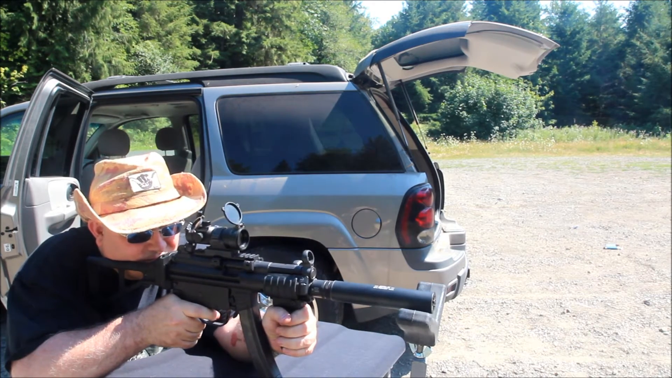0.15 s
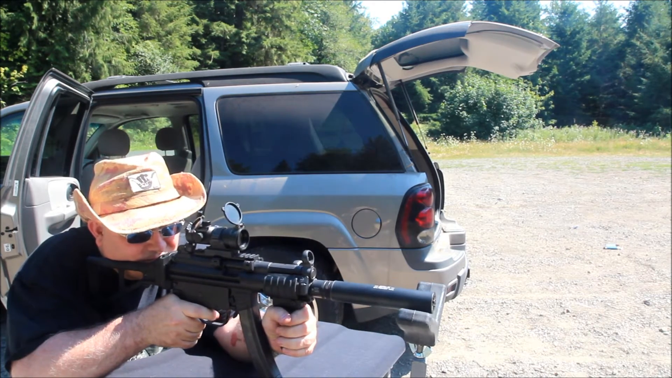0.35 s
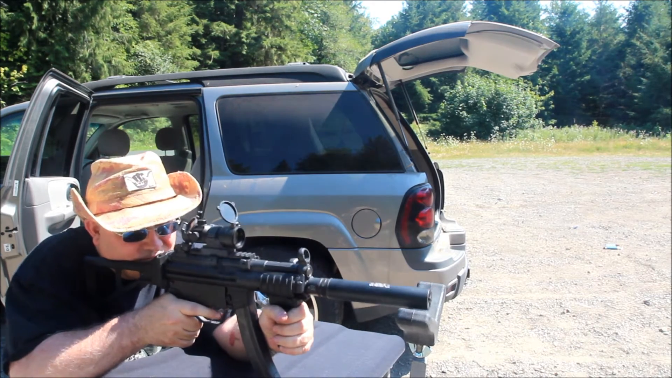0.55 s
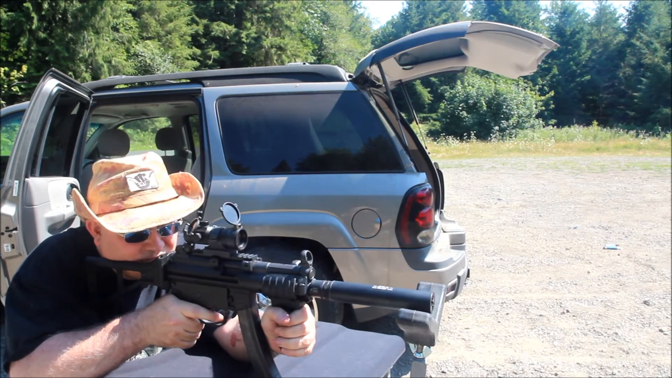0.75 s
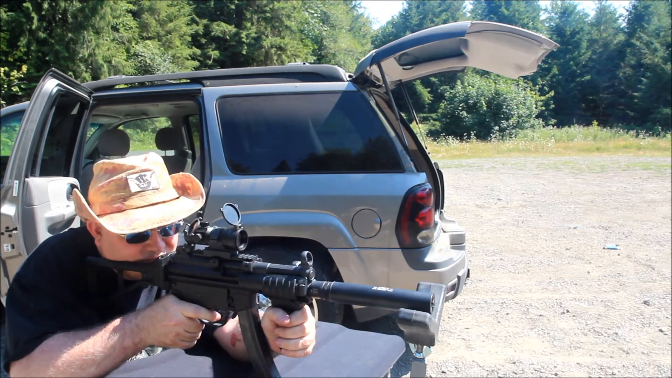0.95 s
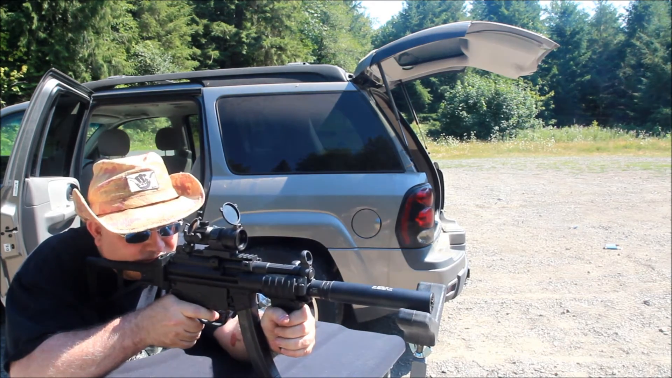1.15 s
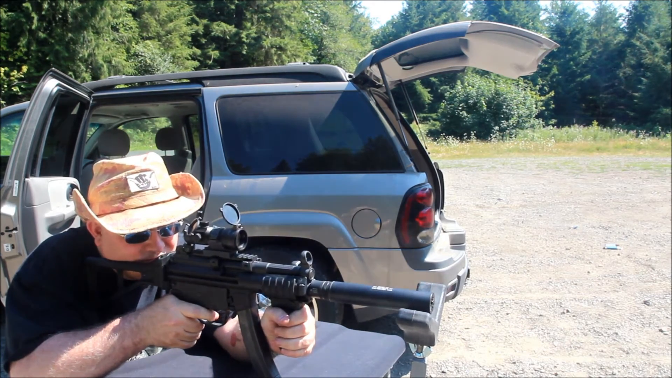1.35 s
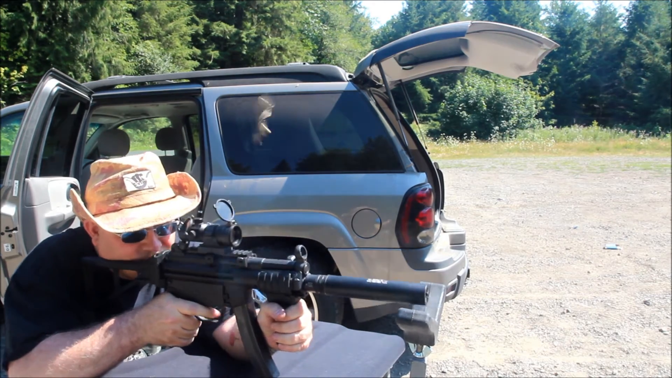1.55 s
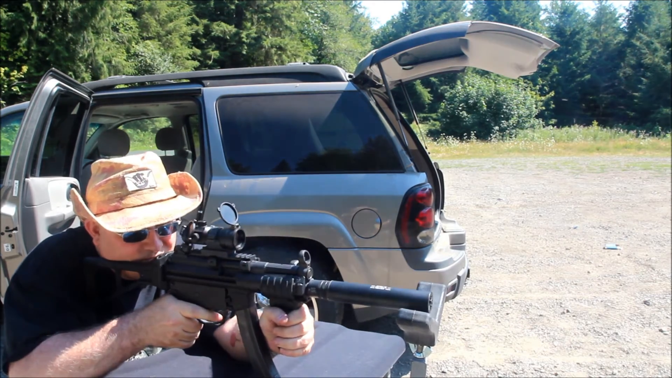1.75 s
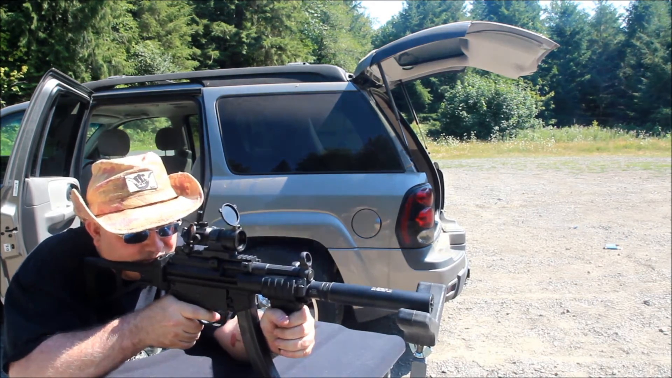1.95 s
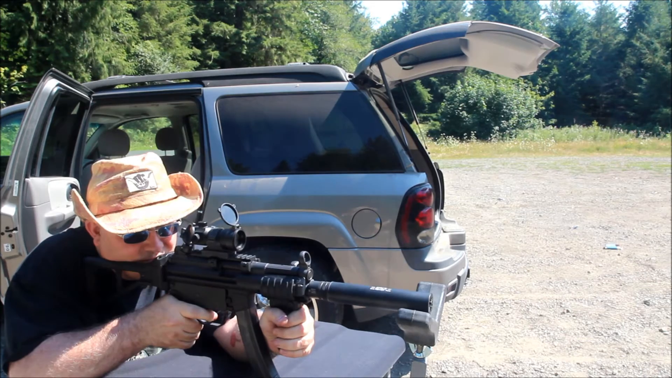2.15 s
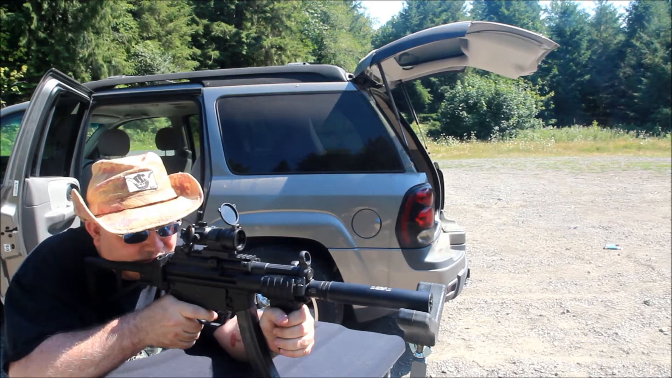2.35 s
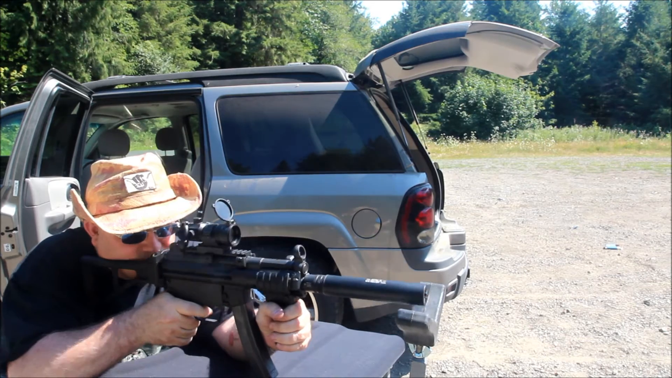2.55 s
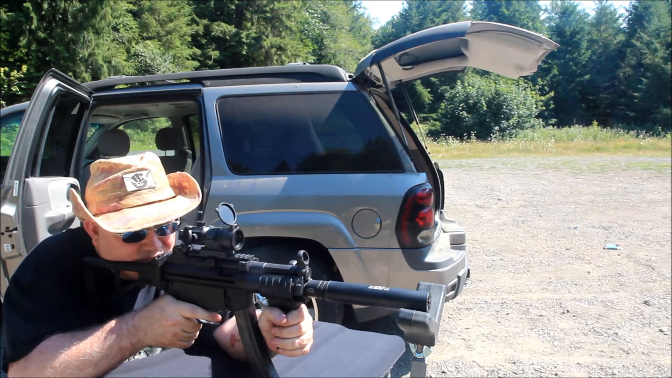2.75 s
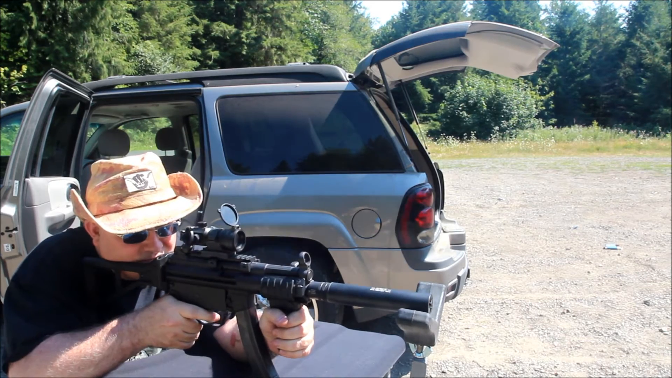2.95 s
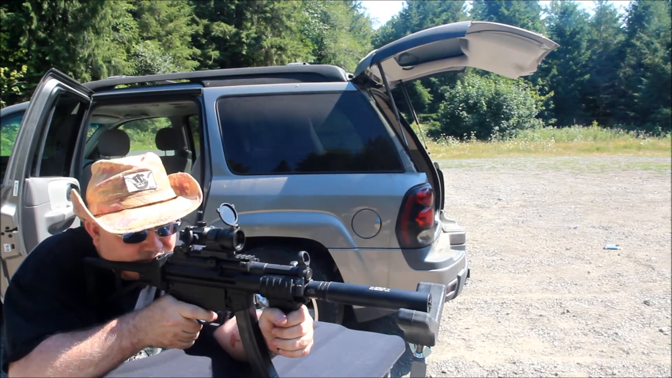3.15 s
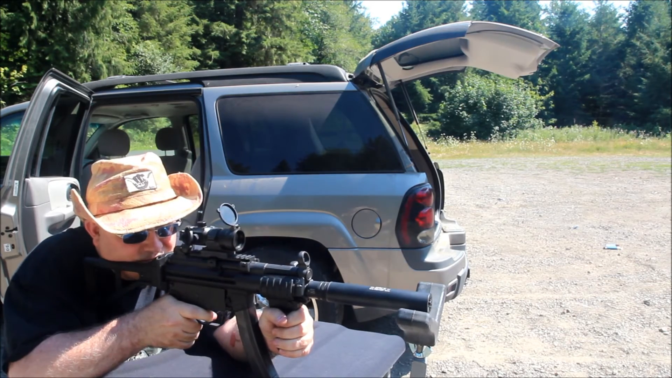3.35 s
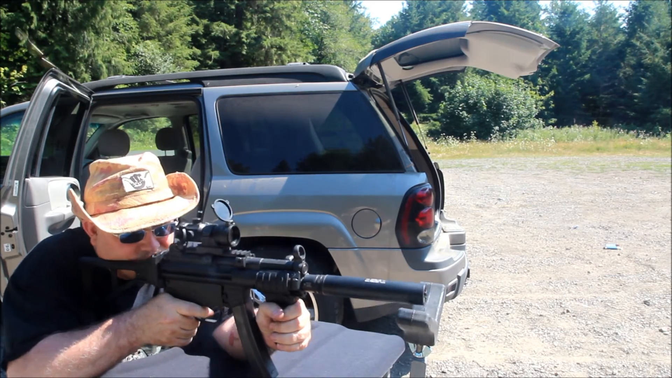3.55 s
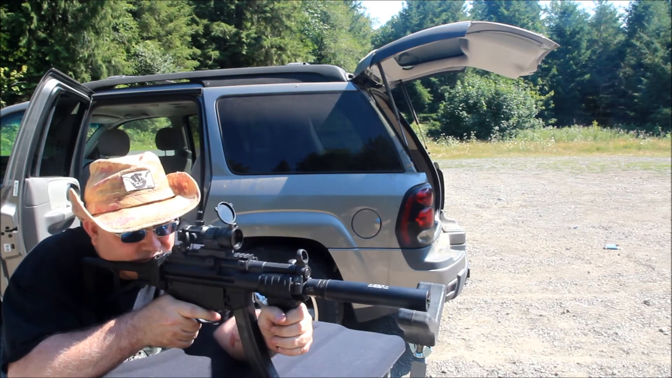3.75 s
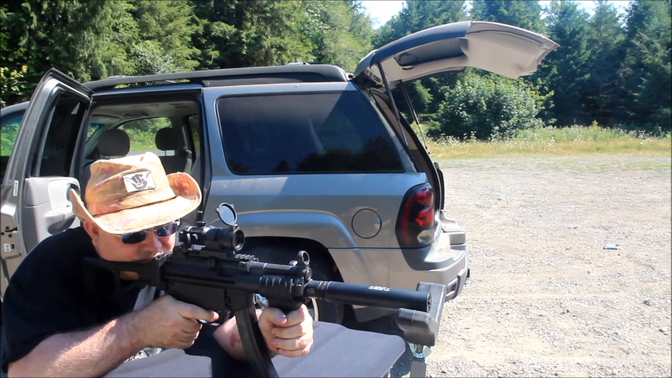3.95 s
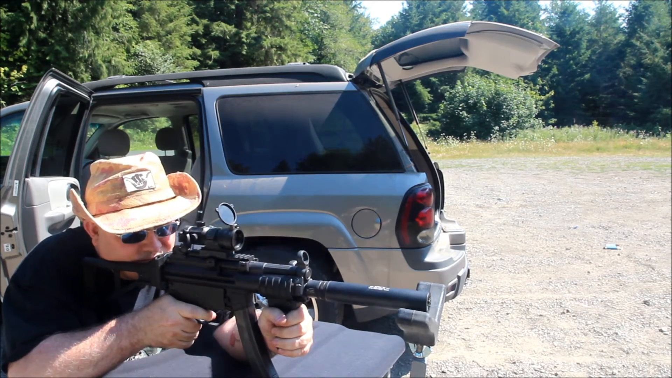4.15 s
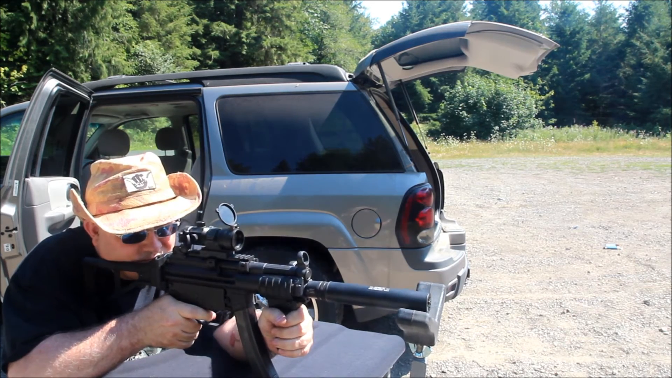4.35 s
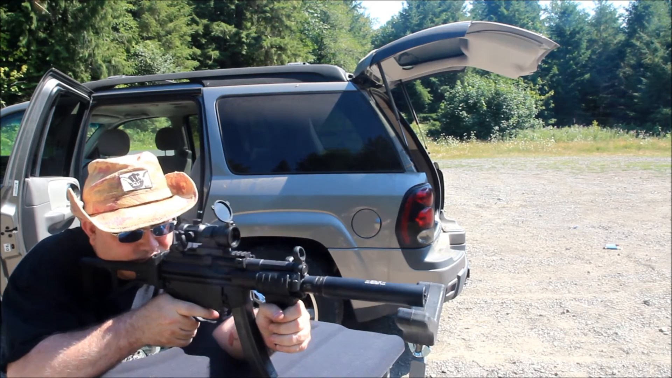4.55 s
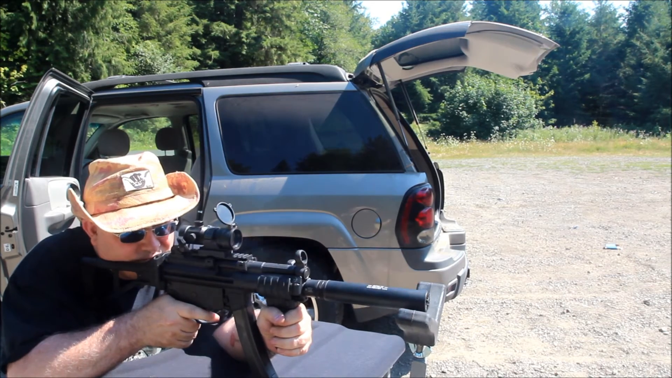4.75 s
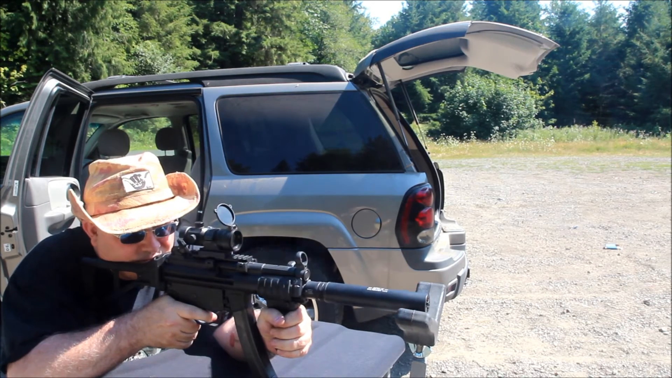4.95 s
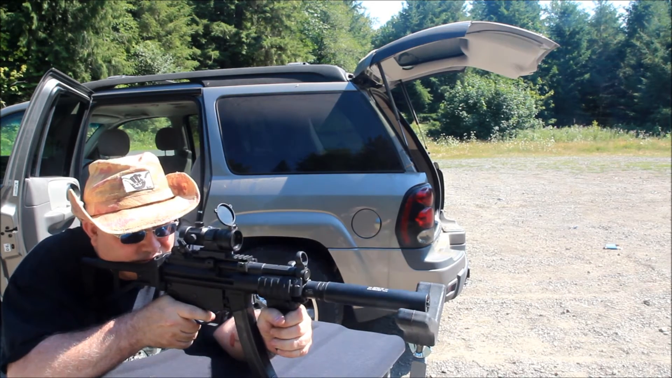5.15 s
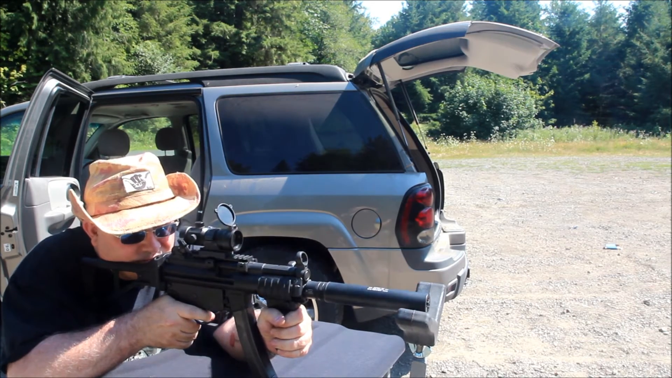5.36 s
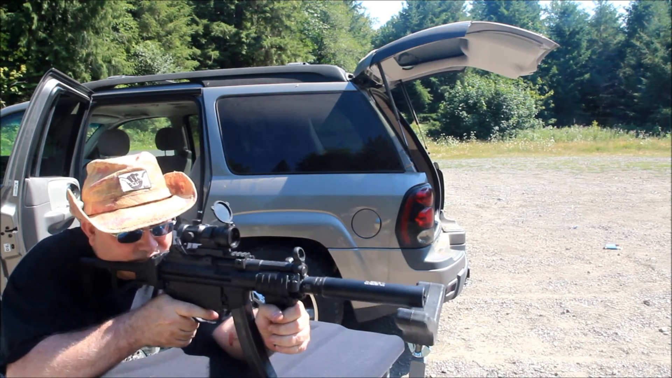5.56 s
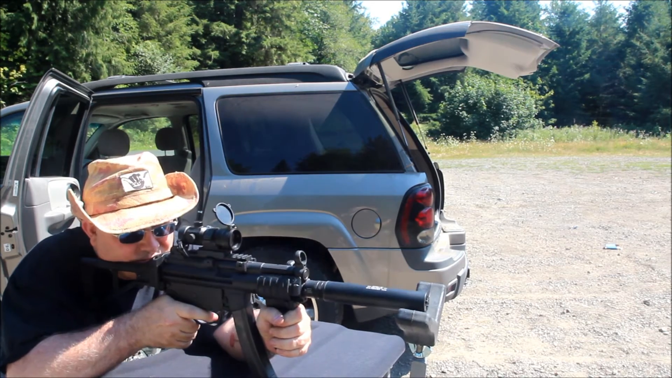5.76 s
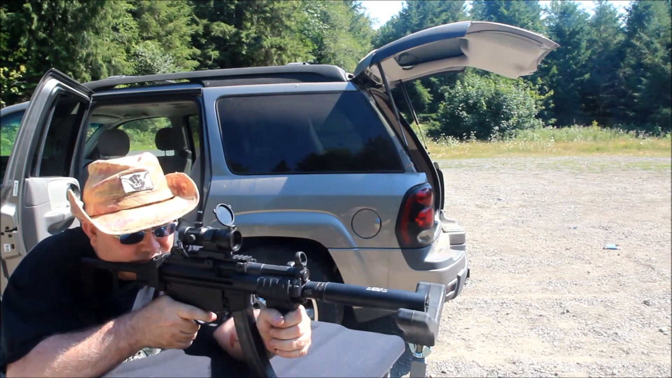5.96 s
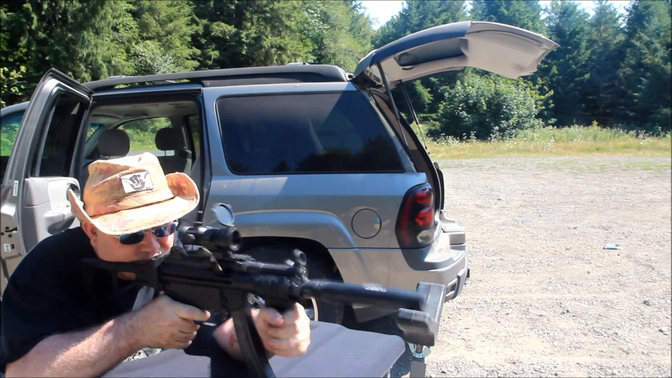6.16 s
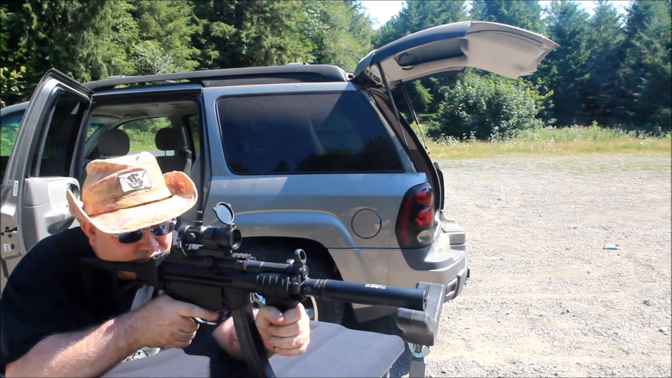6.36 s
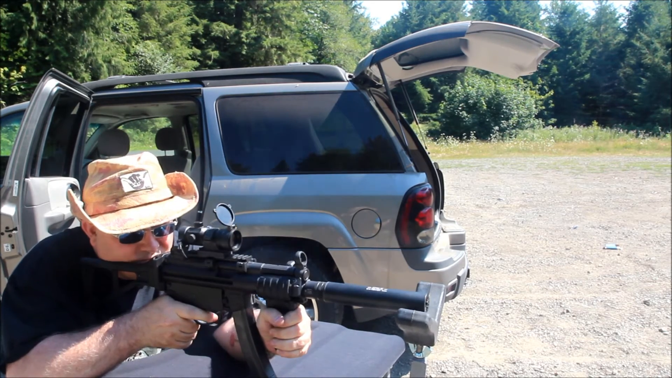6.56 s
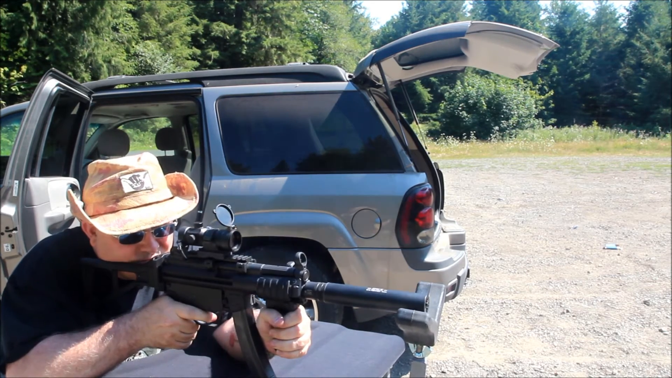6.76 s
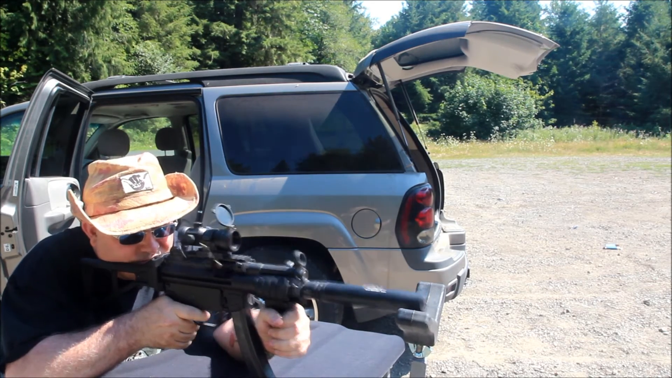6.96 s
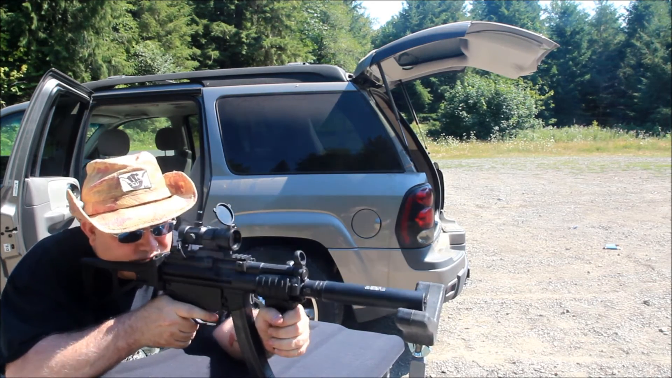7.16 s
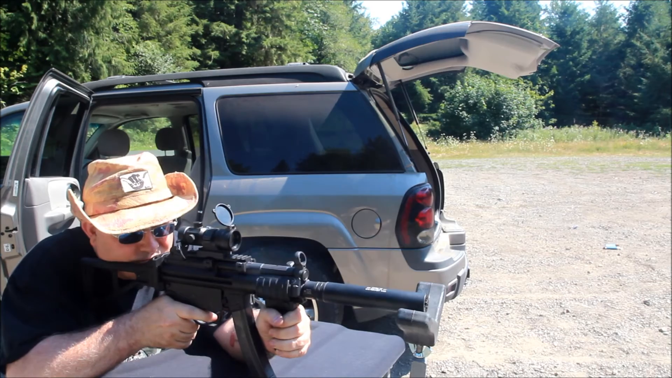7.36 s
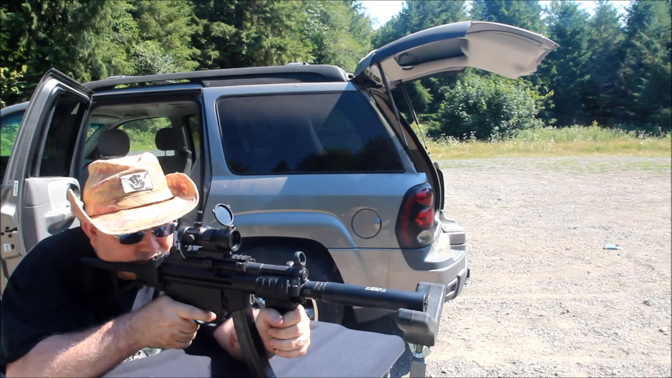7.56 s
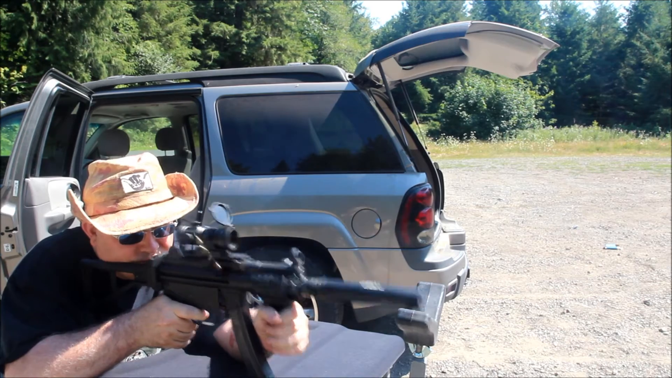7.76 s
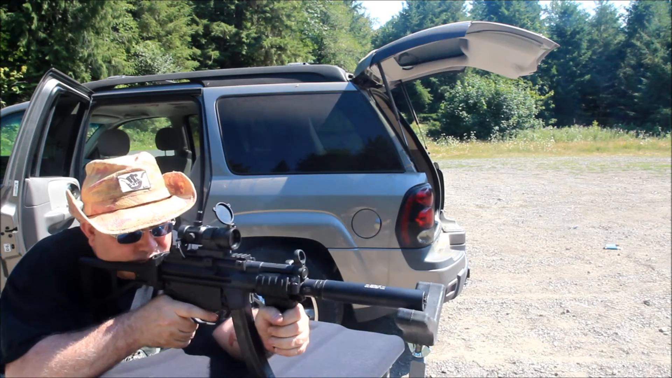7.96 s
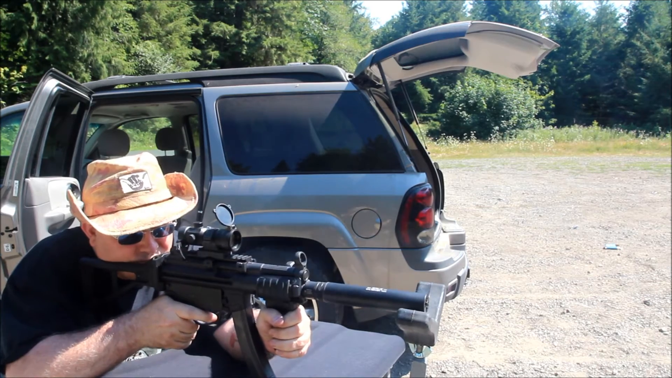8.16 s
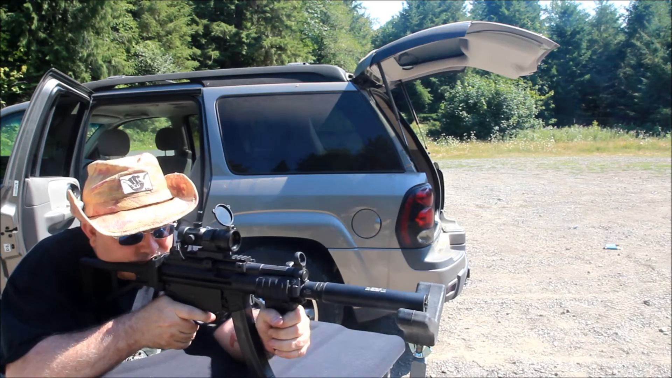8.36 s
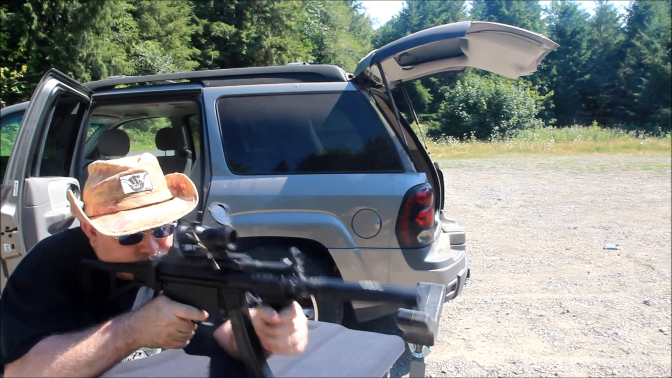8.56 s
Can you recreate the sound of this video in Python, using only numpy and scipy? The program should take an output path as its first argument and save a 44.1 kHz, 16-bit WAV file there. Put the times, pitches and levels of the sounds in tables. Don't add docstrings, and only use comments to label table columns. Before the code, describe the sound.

Nine suppressed gunshots fired singly, each a muffled burst wrapped in clattering steel action, with bullet thumps and tree echoes across an open gravel range.

```python
import sys
import numpy as np
from scipy import signal
from scipy.fft import rfft, irfft
from scipy.io import wavfile
from scipy.ndimage import uniform_filter1d

SR = 44100
rng = np.random.default_rng(int(sys.argv[2]) if len(sys.argv) > 2 else 0)


def waveform_to_disk(signal):
    frames = np.transpose(np.atleast_2d(signal))
    scaled = np.clip(frames, -1, 1) * 32767
    samples = np.round(scaled).astype(np.int16)
    wavfile.write(sys.argv[1], SR, samples)


def undo_db(level):
    steps = np.asarray(level, float) / 20
    return 10 ** steps


N = 379260

# [blast t/s, hammer level/dB, bass push level/dB, bolt back level/dB]
SHOTS = [(0.483, 13, -23.5, -7.5), (1.528, 12, -32, -11), (2.569, 12, -28.5, -1.5), (3.537, 0.5, -35, -7),
         (4.51, 8.5, -24.5, -4.5), (5.503, 9, -31.5, -6.5), (6.252, 0.5, -35, -10), (7.055, 2, -37, -17.5),
         (7.844, 3.5, -28.5, -8.5)]
# [t/s, crack level/dB, thud level/dB]
IMPACT = [(0.7014, -25.5, -31), (1.746, -20.5, -28), (2.7875, -28, -28), (3.7545, -24, -38.5),
          (4.7307, -25.5, -29.5), (5.7221, -30.5, -32.5), (6.4719, -26, -27.5), (7.2767, -27.5, -30),
          (8.0648, -28, -29.5)]
# [f/Hz, level/dB]
HAMMER_COLOUR = [(88, -38), (150, -9.5), (790, -4), (1690, -9.5), (4580, -0.5), (5910, -8), (6390, -2),
                 (12700, -1), (16000, -10)]
# [f/Hz, level/dB]
RATTLE_COLOUR = [(240, -62), (400, -34.5), (719, -14.5), (1040, -26.5), (2470, -14.5), (2930, -4),
                 (5600, -12.5), (7870, -27), (10900, -9.5), (16000, -28.5)]
# [f/Hz, level/dB]
FAR_WIDTH = [(18, -45), (300, -38), (2500, -42), (4400, -25), (8000, -13), (16500, -6.5)]


def at_hz(points, hz):
    f, db = np.transpose(points)
    return np.interp(np.log(hz + 1), np.log(f), db, left=-70, right=-70)


def high_pass(x, hz):
    return signal.sosfilt(signal.butter(2, hz, "high", fs=SR, output="sos"), x)


def coloured(white, colour, width):
    size = white.shape[1]
    hz = np.fft.rfftfreq(size, 1 / SR)
    gain_db = at_hz(colour, hz) + at_hz(width, hz) * [[0], [1]]
    mid, side = irfft(rfft(white) * undo_db(gain_db), size)
    return (mid + side * [[1], [-1]]) / np.sqrt(np.mean(mid ** 2))


def add(out, s, sound, pan_db=0):
    i = round(s * SR)
    panned = sound * undo_db(np.array([[.5], [-.5]]) * pan_db)
    out[:, i:i + sound.shape[-1]] += panned[:, :N - i]


def ring(hz, db, t60, phase):
    t = np.arange(6144) / SR
    fade = undo_db(db - 60 * t / t60) * np.minimum(t / 0.0003, 1)
    return fade * np.sin(2 * np.pi * hz * t + phase)


def blows(table, colour, rise, hold, t60, tail_db, tail_t60, boost_db=-1.5, cut_hz=300, pan_db=0):
    # [f/Hz, level/dB]
    near_width = [(18, -12.5), (200, -16.5), (1300, -23), (3000, -24), (8000, -15), (16500, -8)]
    out, t = np.zeros((2, N)), np.arange(4096) / SR
    after = np.maximum(t - rise - hold, 0)
    swell = np.minimum(t / rise, 1) ** 2 * np.minimum(100 * (t[-1] - t), 1)
    main_fade = undo_db(-60 * after / t60)
    tail_fade = undo_db(tail_db - 60 * after / tail_t60)
    low_pass = signal.butter(2, 6050, fs=SR, output="sos")
    for s, db in table:
        uneven = uniform_filter1d(rng.standard_normal(len(t)), size=24)
        contacts = rng.standard_normal((2, len(t))) * undo_db(14.0 * uneven)
        contacts = coloured(contacts, colour, near_width)
        dull = signal.sosfilt(low_pass, contacts)
        tail = dull + undo_db(-6) * (contacts - dull)
        blow = high_pass(swell * (main_fade * contacts + tail_fade * tail), cut_hz)
        add(out, s, undo_db(db + boost_db) * blow / np.abs(blow).max(), pan_db)
    return out


def air():
    # [f/Hz, level/dB]
    air_colour = [(18, -43.5), (30, -18), (70, -13), (134, -8), (259, -7), (540, -6.5), (1200, -6.5),
                  (1450, -3), (1700, -9.5), (2610, -13), (4650, -18.5), (8000, -26), (16000, -30.5)]
    # [t/s, level/dB]
    breeze = [(0, -55), (.15, -52), (1.5, -51.5), (2.5, -49), (3.5, -54), (4.5, -51.5), (5.5, -52.5),
              (6.3, -54), (7, -51), (8.6, -52.5)]
    duck_db, fall_s, hold_s, climb_db_per_s = -21, 0.077, .2, 24.5
    t, gain_db = np.arange(N) / SR, np.zeros(N)
    for s, *rest in SHOTS:
        climb_db = climb_db_per_s * np.maximum(t - s - hold_s, 0)
        gain_db = np.minimum(gain_db, duck_db * np.clip((t - s) / fall_s, 0, 1) + climb_db)
    noise = coloured(rng.standard_normal((2, N)), air_colour, FAR_WIDTH)
    return undo_db(np.interp(t, *np.transpose(breeze)) + gain_db + 2.5) * noise


def handling():
    # [t/s, peak level/dB]
    thumps = [(.1095, -23.5), (.115, -35), (1.408, -34), (1.4165, -28), (2.5475, -29.5), (7.168, -52),
              (7.403, -51), (7.699, -45), (7.759, -40)]
    # [f/Hz, level/dB]
    thump_colour = [(80, -20.5), (200, -2.5), (700, 0), (1500, -11.5), (3000, -23), (16000, -42.5)]
    # [t/s, peak level/dB]
    knocks = [(0.1148, -24), (2.3882, -11.5), (8.596, -28)]
    # [f/Hz, level/dB]
    knock_colour = [(88, -41), (150, 1), (368, -6.5), (1170, -1.5), (2450, -12), (2870, -12), (5680, -14),
                    (16000, -24)]
    # [t/s, peak level/dB]
    ticks = [(.1152, -29.5), (2.3886, -20), (2.4915, -38), (2.4945, -40), (3.822, -47), (4.784, -37),
             (4.797, -43), (5.071, -47.5), (5.245, -52), (5.46, -40.5), (6.955, -39.5), (7.61, -52.5)]
    # [t/s, peak level/dB]
    rattle = [(0.3924, -24), (.409, -22), (0.4114, -18), (.421, -27)]
    # [f/Hz, level/dB, t60/s]
    swivel = [(3360, -27, 0.073), (2980, -26, .06), (5330, -32, 0.054), (720, -33, .05), (6400, -36, .06),
              (4300, -36, .06)]
    # [t/s, peak level/dB]
    slack = [(6.2092, -26.5), (7.0135, -21.5), (7.034, -30.5), (7.039, -29.5), (7.7995, -27)]
    # [f/Hz, level/dB]
    slack_colour = [(180, -51), (300, -24.5), (856, -16), (1140, -1.5), (2280, -12), (2520, -13.5),
                    (4910, -12.5), (6520, -16.5), (16000, -26.5)]
    out = blows(thumps, thump_colour, 0.0014, 0.0017, 0.017, -14.5, .07, cut_hz=90)
    out += blows(knocks, knock_colour, 0.001, 0.001, .02, -12, 0.087, boost_db=-9.5, cut_hz=120)
    step = np.interp(np.arange(1024) / SR / 0.001, [0, .2, .45, 1], [-0.1, -0.93, 0.83, -0.2])
    for s, db in knocks:
        add(out, s + .0008, undo_db(db - 1) * high_pass(step, 300))
    out += blows(ticks, HAMMER_COLOUR, .0003, 0.00034, .008, -12, .03, boost_db=-4.5, cut_hz=3000)
    out += blows(rattle, RATTLE_COLOUR, 0.0008, .001, .02, -11, .09)
    for hz, db, t60 in swivel:
        add(out, rattle[0][0], ring(hz, db - 10.5, t60, 0))
        add(out, rattle[2][0], ring(hz, db, t60, 0))
    return out + blows(slack, slack_colour, 0.00099, 0.0033, 0.034, -14.5, 0.11)


def bouncing_case():
    # [f/Hz, level/dB]
    tones = [(10100, 2), (13000, -4), (14700, -6)]
    # [t/s, level/dB, lean to the upper tones/dB]
    bounces = [(5.59, -52, 0), (5.665, -59.5, -9), (5.744, -63, -5), (5.823, -76, 6), (5.851, -74, 5)]
    rise_db_per_s, fall_db_per_s = 4000, 220
    out, start = np.zeros((2, N)), bounces[0][0] - .05
    t = start + np.arange(16384) / SR
    for k, (hz, db) in enumerate(tones):
        levels_db = []
        for s, bounce_db, lean_db in bounces:
            drop_db = np.maximum(rise_db_per_s * (s - t), fall_db_per_s * (t - s))
            levels_db.append(bounce_db + k * lean_db - drop_db)
        level_db = np.max(levels_db, axis=0)
        facing = np.cos(2 * np.pi * 3.4 * t + 2.1 * k)
        turns = hz * (t + .00006 * np.sin(2 * np.pi * 6.0 * t))
        add(out, start, undo_db(level_db + db + 1.5 * facing) * np.sin(2 * np.pi * turns))
    return out


def cases():
    # [t/s, peak level/dB, f/Hz, t60/s]
    strikes = [(0.3926, -33, 10610, 0.21), (0.4115, -29, 10660, 0.27), (1.684, -63, 10660, 0.27),
               (2.388, -40.5, 10500, 0.16), (2.43, -48.5, 10600, 0.2), (5.071, -71.5, 10750, 0.28),
               (5.094, -61, 10670, .25), (5.13, -57, 10700, 0.19), (5.16, -54, 10760, 0.071),
               (6.921, -62.5, 10700, 0.24), (7.475, -47.5, 10600, 0.17), (7.51, -61, 10650, 0.27),
               (8.114, -72.5, 10650, 0.43), (8.334, -60, 10570, 0.21)]
    # [f/Hz, level/dB, t60/s]
    near_modes = [(7590, -3, .09), (10750, -33.5, .12), (15070, -29, .08), (2980, -26, 0.024),
                  (4500, -28, .03)]
    near_s = 3.4862
    out = np.zeros((2, N))
    for s, db, hz, t60 in strikes:
        add(out, s, ring(hz, db, t60, 0) + ring(hz + 70, db - 11.0, t60, 0))
    ticks = [(s, db) for s, db, hz, t60 in strikes]
    out += blows(ticks, HAMMER_COLOUR, 0.00035, .002, .02, -11.0, .05, boost_db=-2.0, cut_hz=5400)
    out += blows([(near_s, -9)], RATTLE_COLOUR, 0.00055, 0.0009, 0.03, -10.5, 0.064)
    for hz, db, t60 in near_modes:
        twin = ring(hz + 100, db - 16.5, 2.5 * t60, 1.9)
        add(out, near_s, ring(hz, db, t60, 0) + twin)
    return out + bouncing_case()


def ducking():
    duck_db, recover_s = -33, .12
    t, db = np.arange(N) / SR, np.zeros(N)
    for s, *rest in SHOTS:
        db = np.minimum(db, duck_db * (t > s) * np.clip(1.5 - (t - s) / recover_s, 0, 1))
    return undo_db(db)


def hammer():
    falls = [(s - .0077, db) for s, db, *rest in SHOTS]
    return blows(falls, HAMMER_COLOUR, .0013, 0.00074, 0.0094, -10.0, 0.063, boost_db=-2.5, pan_db=0.5)


def blast():
    # [f/Hz, level/dB]
    blast_colour = [(18, -45.5), (30, -14), (287, -11.5), (1430, -11), (1910, -3.5), (2750, -9),
                    (4420, -5.5), (5590, -4.5), (8520, -6), (13700, -7.5), (16000, -14.5)]
    # [delay t/s, f/Hz, level/dB, t60/s]
    tube = [(.0008, 1912, -9.5, .02), (.0008, 2430, -16.5, .025), (.001, 1524, -13, .025),
            (.001, 3055, -11.5, 0.016), (.004, 5560, -8.5, .02), (.003, 1182, -21, .04)]
    # [delay t/s, f/Hz, level/dB, t60/s]
    body = [(0.00011, 250, 3.5, 0.061), (0.0046, 140, -2, 0.075), (0.00079, 39, -7, 0.069),
            (0.0018, 340, 0.5, 0.057)]
    # [start f/Hz, end f/Hz, level/dB]
    whistle = (9201, 5501, -12)
    blast_db, glide_s = 4.5, .005
    bursts = [(s, blast_db) for s, *rest in SHOTS]
    out = blows(bursts, blast_colour, .0014, .0042, 0.014, -9, 0.085, boost_db=5.0, cut_hz=290)
    start_hz, end_hz, whistle_db = whistle
    t = np.arange(600) / SR
    fall = .5 + .5 * np.cos(np.pi * np.minimum(t / glide_s, 1))
    fade = np.minimum(t / 0.00036, 1) * undo_db(-60 * np.maximum(t - glide_s, 0) / .01)
    for s, hammer_db, bass_db, back_db in SHOTS:
        for modes, level_db in ((tube, blast_db), (body, bass_db + 4)):
            for delay, hz, mode_db, t60 in modes:
                a, b, c = rng.standard_normal(3)
                mode = ring(hz * (1 + .03 * a), level_db + mode_db + 2.0 * b, t60, 1.6 * c)
                add(out, s + delay, mode, 1.5 * (a - c))
        hz = (end_hz + (start_hz - end_hz) * fall) * (1 + 0.053 * rng.standard_normal())
        tone = np.sin(2 * np.pi * np.cumsum(hz) / SR)
        add(out, s + .0008, undo_db(blast_db + whistle_db) * fade * tone)
    return out


def bolt():
    # [t/s, peak level/dB]
    shut = [(0.5305, 1), (1.577, -2), (2.6168, -1.5), (3.584, -5), (4.556, -1), (5.549, -1.5),
            (6.299, -5.5), (7.102, -4), (7.89, -3)]
    # [f/Hz, level/dB]
    bolt_colour = [(88, -68), (150, -36), (1210, -7), (1600, -7.5), (1980, -5), (5360, -7.5), (5910, -3),
                   (6770, -7), (9440, -8.5), (16000, -8)]
    # [f/Hz, level/dB, t60/s]
    breech = [(1970, -19, .018), (3860, -17, 0.016), (5900, -17, 0.01), (7800, -18, .01), (11000, -18, .01)]
    s, hammer_db, bass_db, back_db = np.transpose(SHOTS)
    feed_db = -14 + 0.43 * np.transpose(shut)[1]
    rebounds = [(shut_s + 0.01, db - 17) for shut_s, db in shut]
    out = blows(zip(s + .018, back_db), bolt_colour, .002, 0.003, 0.012, -6.5, 0.12, boost_db=-4.5)
    out += blows(zip(s + .0355, feed_db), bolt_colour, .0008, .012, .02, -14, .05, boost_db=.7)
    out += blows(shut, bolt_colour, 0.0012, 0.0012, 0.018, -14.0, 0.061, boost_db=-2.5)
    for shut_s, db in shut:
        for hz, mode_db, t60 in breech:
            a, b = rng.standard_normal(2)
            add(out, shut_s + .001, ring(hz * (1 + 0.036 * a), db + mode_db + 2.5 * b, t60, 0))
    return out + blows(rebounds, bolt_colour, 0.00065, .001, .02, -14, 0.1)


def trees():
    # [f/Hz, level/dB]
    tree_colour = [(350, -45), (600, -16.5), (703, -6), (1000, -9), (1060, -7.5), (3510, -1), (7340, -5.5),
                   (14000, -35.5)]
    # [f/Hz, level/dB]
    near_colour = [(470, -40), (800, -6.5), (1270, -12), (2270, -5), (3300, -10), (5100, -10), (5750, -3.5),
                   (6500, -11.5), (15000, -30)]
    out, t = np.zeros((2, N)), np.arange(32768) / SR
    low_pass = signal.butter(2, 4000, fs=SR, output="sos")
    near_fade = undo_db(-55.5 + 1.5 - 9 * t / 0.28 - 60 * np.maximum(t - .32, 0) / .4)
    near_fade = near_fade * np.clip(t / 0.057 - .9, .15, 1)
    swell = np.minimum(t / 0.051, 1) * np.minimum(5 * (t[-1] - t), 1)
    for (shot, *rest), (hit, crack_db, thud_db) in zip(SHOTS, IMPACT):
        s = shot + .349
        db = -36 + 0.62 * crack_db
        near = coloured(rng.standard_normal((2, len(t))), near_colour, FAR_WIDTH)
        add(out, s - .29, near_fade * near)
        wash = coloured(rng.standard_normal((2, len(t))), tree_colour, FAR_WIDTH)
        dull = signal.sosfilt(low_pass, wash)
        fading = dull * undo_db(-60 * t / 2.2) + (wash - dull) * undo_db(-60 * t / .8)
        add(out, s - .025, undo_db(db + 2.5) * swell * fading)
    return out


def late_click():
    # [t/s, peak level/dB]
    clicks = [(0.612, -22.5), (1.648, -21), (2.691, -26), (3.687, -22), (4.634, -24.5), (5.633, -24),
              (6.368, -23), (7.208, -22), (7.998, -23.5)]
    # [f/Hz, level/dB]
    click_colour = [(180, -60), (300, -49.5), (701, 1.5), (961, -13), (1460, -2), (2440, -9), (6300, -6),
                    (9550, -9.5), (10400, -7), (16000, -16)]
    # [f/Hz, level/dB, t60/s]
    click_modes = [(708, -18.5, 0.05), (2223, -16.5, 0.031), (6200, -7.5, 0.012)]
    out = blows(clicks, click_colour, 0.001, 0.0044, 0.029, -19, 0.19)
    for s, db in clicks:
        for hz, mode_db, t60 in click_modes:
            add(out, s + 0.0009, ring(hz, db + mode_db, t60, 0))
    return out


def bullet():
    # [f/Hz, level/dB]
    earth_colour = [(100, -17), (300, -6), (700, -5), (2500, -16), (8000, -20.5), (16000, -48)]
    # [delay t/s, length t/s, share of the dip/1, rebound/1, level/dB, low cut f/Hz]
    steps = [
        (.001, 0.00067, .12, 0.4, 2, 203),
        (.0066, 0.0022, .25, 0.77, -1.5, 152),
        (.0155, .0005, .2, .6, -11, 503),
        (.0205, .0018, 0.21, 1, -15, 196.9),
    ]
    thuds = [(s, thud_db) for s, crack_db, thud_db in IMPACT]
    out = blows(thuds, earth_colour, 0.0061, 0.0032, 0.088, -1, 0.18, boost_db=-10.5, cut_hz=120)
    t = np.arange(2048) / SR
    for s, crack_db, thud_db in IMPACT:
        for k, (delay, length, dip, rebound, step_db, cut_hz) in enumerate(steps):
            step = np.interp(t / length, [0, dip, 2 * dip, 1], [0, -1, rebound, 0])
            level_db = thud_db if k else crack_db
            chance_db = rng.standard_normal()
            add(out, s + delay, undo_db(level_db + step_db + chance_db) * high_pass(step, cut_hz))
    return out


def scene():
    gun = handling() + hammer() + blast() + bolt() + late_click()
    return air() + gun + ducking() * cases() + trees() + bullet()


def top_cut(x):
    return signal.sosfilt(signal.butter(12, 16200, fs=SR, output="sos"), x)


def record(dry):
    clipped = np.clip(dry, -.99, .99)
    steep = signal.cheby2(10, 40, 17000, fs=SR, output="sos")
    mix = signal.sosfilt(steep, clipped)
    return top_cut(mix)


dry = scene()
out = record(dry)
waveform_to_disk(out)
```